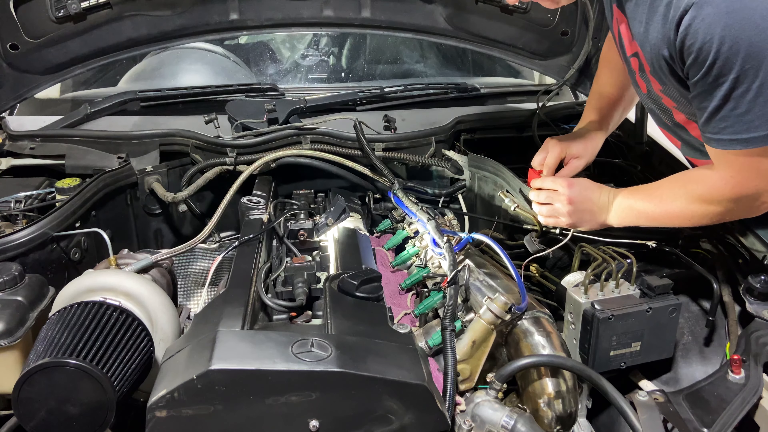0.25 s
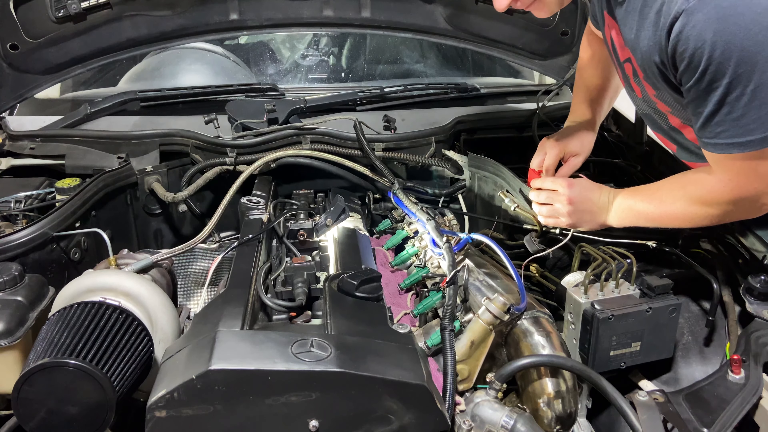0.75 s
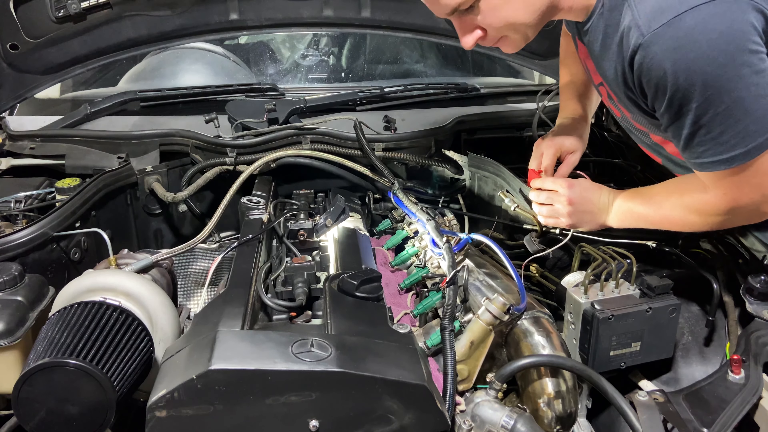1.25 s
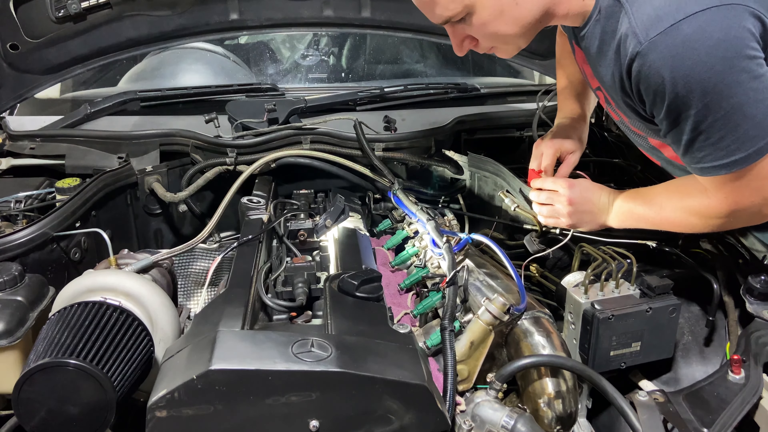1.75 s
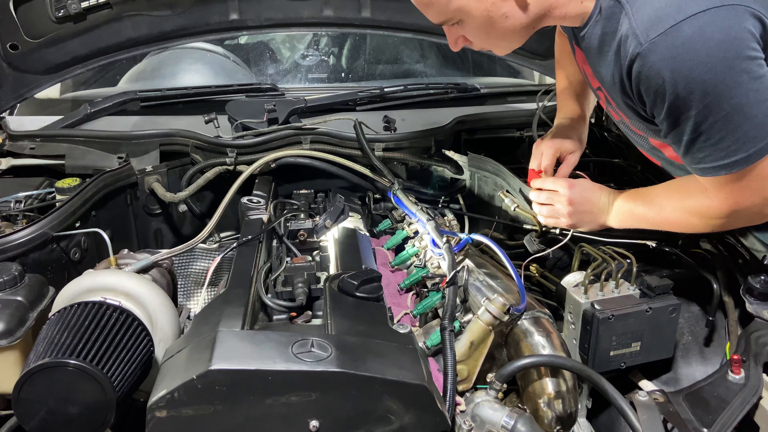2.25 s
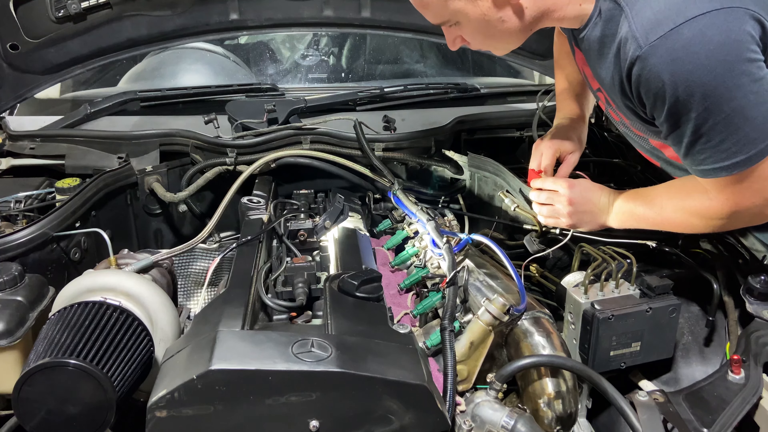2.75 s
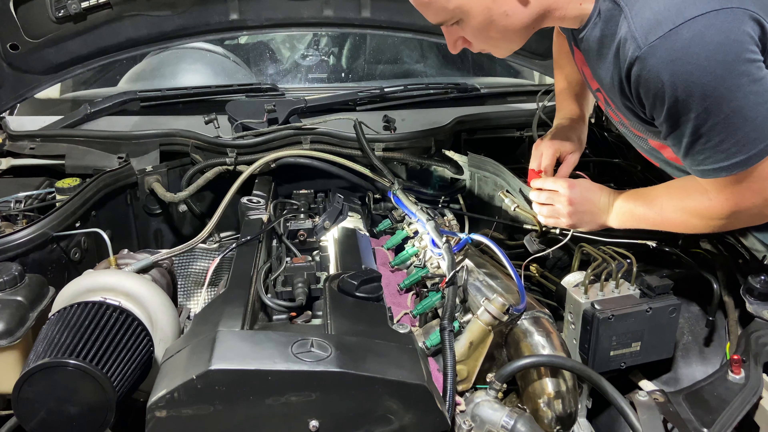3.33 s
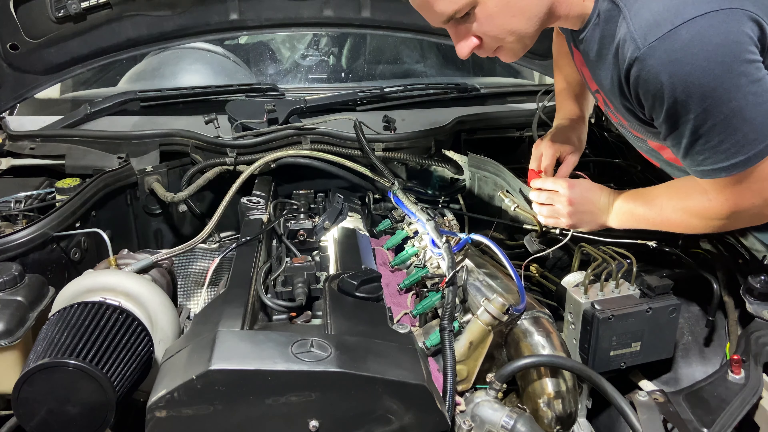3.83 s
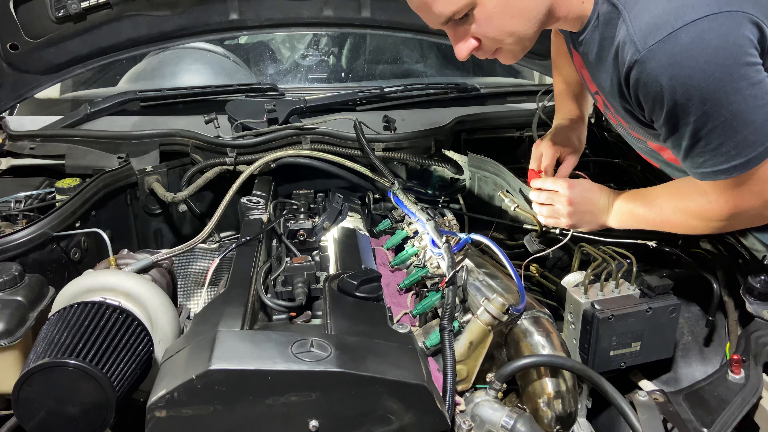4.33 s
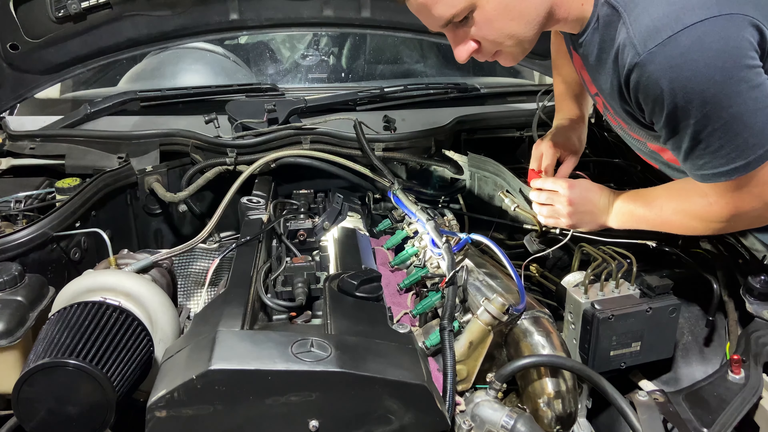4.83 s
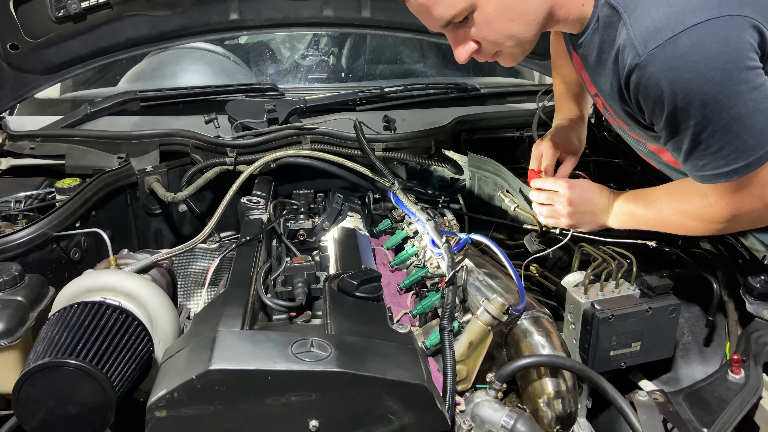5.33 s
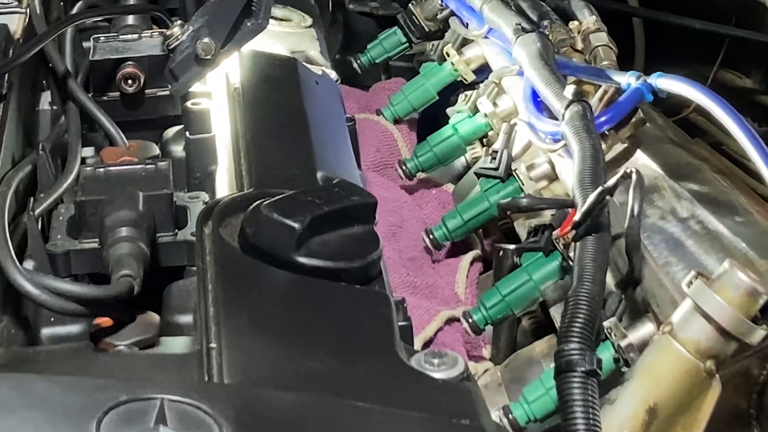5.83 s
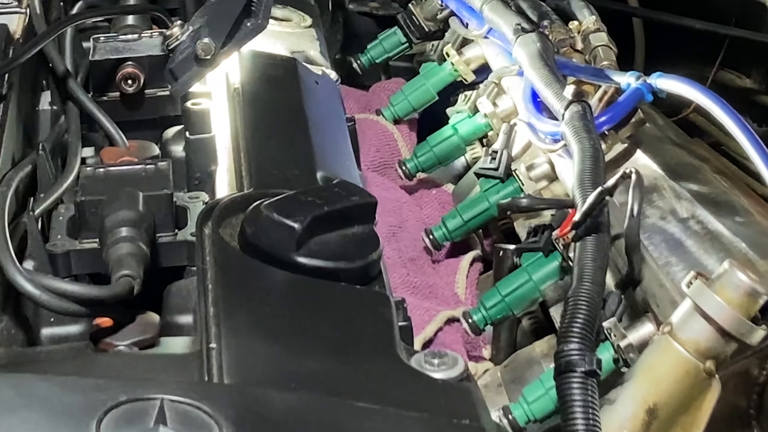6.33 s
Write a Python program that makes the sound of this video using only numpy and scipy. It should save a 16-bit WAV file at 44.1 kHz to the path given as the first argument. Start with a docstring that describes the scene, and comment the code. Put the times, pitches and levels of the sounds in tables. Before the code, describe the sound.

Close over an open engine bay: a hard metallic clack, a brief gear whine, then steady fast starter churning, rattly and breathy, without catching.

```python
"""In a garage, close over the open bonnet: a starter motor cranks a six-cylinder engine that does not fire.
First the solenoid slams the pinion in, ringing the housing, and the intake booms twice as the crank lurches.
Then the motor whirrs and its gears whine up to speed, over hiss. Each compression stroke ticks, knocks,
puffs air, loads the gear teeth, rasps and thumps the intake; metal ticks, the block hums, dull thuds pass.
Bonnet and walls echo. Two microphone ports share the bass; the left hears the high treble late and inverted."""
import sys
import numpy as np
from scipy import signal
from scipy.fft import rfft, irfft
from scipy.io import wavfile
from scipy.ndimage import uniform_filter1d

SR = 44100
rng = np.random.default_rng(int(sys.argv[2]) if len(sys.argv) > 2 else 0)


def output_pcm(signal):
    """Save a mono or channel-first signal as 16-bit PCM at the path in sys.argv[1].

    Samples are clipped to [-1, 1] before scaling.
    """
    pcm = np.clip(np.atleast_2d(signal).T, -1, 1) * 32767
    wavfile.write(sys.argv[1], SR, np.round(pcm).astype(np.int16))


N = 291060
T = np.arange(N) / SR
HZ = np.arange(N // 2 + 1) * SR / N + 1e-3  # never zero, for the logarithm
# how a sound is sent to the (shared, apart) signals of the two ports
SHARED = np.array([[1], [0]])  # heard alike at both
NEAR = np.array([[1], [.45]])  # a close part, mostly alike


def undb(db):
    """Decibels to an amplitude factor."""
    return 10 ** (np.asarray(db) / 20)


def unit(x):
    """Scale to an RMS of 1."""
    return x / np.sqrt(np.mean(x ** 2))


def over_time(table, **edges):
    """A (start_s, value) table read at every sample."""
    return np.interp(T, *np.transpose(table), **edges)


def over_hz(table):
    """A (pitch_hz, value) table read on the spectrum's bins, along log frequency."""
    hz, value = np.transpose(table)
    return np.interp(np.log(HZ), np.log(np.maximum(hz, 1)), value)


def noise(table):
    """Two unrelated noises of one colour, each bin weighted by the table."""
    spectrum = rfft(rng.standard_normal((2, N)))
    return unit(irfft(spectrum * undb(over_hz(table)), N))


def ring(x, hz, width):
    """One resonance, gain 1 at its centre."""
    return signal.lfilter(*signal.iirpeak(hz, hz / width, fs=SR), x)


def resonate(sound, table):
    """Resonances added in parallel, each lifting its own narrow band by about its level."""
    return sound + sum((undb(db) - 1) * ring(sound, hz, width) for hz, width, db in table)


def blows(times, db):
    """An impulse for each event."""
    x = np.zeros(N)
    x[np.clip((times * SR).astype(int), 0, N - 1)] = undb(db)
    return x


def swell(times, db, rise_s, hold_s, fall_s):
    """An envelope in which each event rises, holds and dies away exponentially."""
    t = T[:SR // 4]
    fall = np.exp(-np.maximum(t - rise_s - hold_s, 0) / fall_s)
    return signal.fftconvolve(blows(times, db), np.clip(t / rise_s, 0, 1) * fall)[:N]


def walk(rate):
    """Two slow random drifts of spread 1: white noise averaged twice over 1 / rate seconds."""
    size = int(SR / rate)
    return unit(uniform_filter1d(uniform_filter1d(rng.standard_normal((2, N)), size), size))


def whine(hz, wander_hz, rough_db, rate):
    """A tone whose pitch wanders and whose strength flutters."""
    strength = undb(rough_db * walk(106))
    cycles = np.cumsum(hz + wander_hz * walk(rate), axis=1) / SR
    return strength * np.sin(2 * np.pi * cycles)


# colour of the air puffs: pitch_hz, level_db (relative, per Hz)
PUFF_COLOUR = [(30, -50), (60, 6), (150, -18), (300, -1.5), (700, 0), (1200, 1.5), (1950, -4), (2500, -5.5),
               (3700, -17.5), (6000, -14), (10000, -21.5), (16000, -30)]


def air_puff(s, db):
    """Compressed air puffs out at each stroke: a short burst of broad, fluttering noise."""
    flutter = undb(0.88 * walk(170))
    return swell(s, db - 14.0, 0.002, 0.034, 0.018) * flutter * noise(PUFF_COLOUR)


def stroke_tick(s, db):
    """A small bright tick begins just ahead of each stroke, made of treble noise."""
    colour = [(2500, -30), (5000, -3), (7000, -6), (11000, 0), (16000, -3)]
    return swell(s - .004, db - 23, .006, .002, .008) * noise(colour)


# loose teeth slap on after a knock
BACKLASH_COUNT, BACKLASH_S = 2, (.012, .042)  # slaps per stroke, range of delays after its start
BACKLASH_DB, SCATTER_DB = -27.5, 5  # strength of a slap relative to the modes' drive, and its spread
# the block rings at each knock: pitch_hz, width_hz, level_db (relative)
BLOCK_MODES = [(284, 40, -4), (410, 50, -0.5), (734, 100, -3), (955, 47, 6), (1070, 40, 6.5), (1277, 43, 2),
               (1440, 68, 2), (1600, 150, -5.5), (2170, 350, -8.5)]


def block_knock(s, knock_db):
    """A burst of mid noise while the knock and the later slaps strike the block's resonances."""
    colour = [(600, -74), (900, 14.5), (1300, 10.5), (2200, -13.0)]
    knock = swell(s, knock_db - 1.5, 0.0047, 0.01, 0.016) * noise(colour)
    late = rng.random((len(s), BACKLASH_COUNT))
    slap_s = (s[:, None] + BACKLASH_S[0] + late * np.diff(BACKLASH_S)).ravel()
    for hz, width, db in BLOCK_MODES:  # every slap strikes the modes differently
        slaps = blows(slap_s, BACKLASH_DB + SCATTER_DB * rng.standard_normal(len(slap_s)))
        strikes = blows(s + 0.003, knock_db) + slaps
        knock = knock + NEAR * undb(db + 32.5) * ring(strikes, hz, width)
    return knock


# rasp of a stroke: start_s, level_db (relative)
RASP_LEVEL = [(0.34, -50), (.44, -41), (.56, -29), (.9, -31.5), (6.6, -27.5)]


def stroke_rasp(s):
    """Each stroke rasps in a narrow band of noise."""
    colour = [(3100, -33), (3450, 0.5), (3750, 1.5), (3880, 2), (4100, 0.5), (4400, -33)]
    level_db = np.interp(s, *np.transpose(RASP_LEVEL)) - 6
    return swell(s + 0.0035, level_db, 0.003, 0.021, 0.034) * noise(colour)


# rate at which teeth meet: start_s, pitch_hz
TOOTH_RATE = [(0.45, 509.9), (2.47, 509.4), (6.6, 527.3)]


def loaded_teeth(s, load_db):
    """The gear mesh sings at its tooth rate while a stroke loads it."""
    load = swell(s + 0.0068, load_db + 5.0, 0.0035, 0.022, 0.021)
    return NEAR * load * whine(over_time(TOOTH_RATE), 9.28, 1.3, 69.5)


# intake resonances: pitch_hz, width_hz, level_db (relative)
INTAKE_MODES = [(169, 27, -1), (190, 22, -2.5)]


def intake_thump(s, thump_db):
    """A firm push, its weaker rebound and turbulent air excite the intake, filtered three times over."""
    push = blows(s + 0.00697, thump_db + 59.5) + blows(s + 0.0325, thump_db + 44)
    air = swell(s + 0.0127, thump_db + 8, 0.0017, 0.009, .012) * rng.standard_normal((2, N))
    thump = 0
    for hz, width, db in INTAKE_MODES:
        broad = ring(ring(push * SHARED + air, hz, 2 * width), hz, 2 * width)
        thump = thump + undb(db) * ring(broad, hz, width)
    return thump


TICKS_PER_S = 260
TICK_FLOOR_DB, TICK_SCATTER_DB = -24, 4  # weakest impulse, mean excess over it (before the filter)


def metal_ticks(first_s):
    """Small metal parts tick at random from the first stroke on, through one broad treble resonance."""
    place, luck = rng.random((int(TICKS_PER_S * T[-1]), 2)).T
    level_db = TICK_FLOOR_DB - TICK_SCATTER_DB * np.log(1 - luck)
    ticks = blows(place * T[-1], level_db) * (T > first_s)
    return NEAR * ring(ticks, 5100, 3600)


# compression strokes, six cylinders in turn, levels relative within each part:
# start_s, puff_and_tick_db, intake_thump_db, gear_load_db, knock_db
COMPRESSIONS = [(0.341, -18.5, -53, -54, -39), (0.443, -16, -28.5, -29, -29),
                (0.566, -11.5, -25, -34, -25.5), (0.677, -9.5, -28, -22.5, -25),
                (0.784, -12, -27, -35, -28), (0.884, -13.5, -28, -28, -27), (0.986, -12.5, -30, -28, -53),
                (1.089, -14.5, -26, -30.5, -27), (1.193, -12.5, -26.5, -28.5, -28.5),
                (1.295, -16, -32, -26.5, -29), (1.4, -12.5, -30.5, -34, -29),
                (1.501, -15.5, -26, -33.5, -28), (1.607, -17, -33, -31, -28.5),
                (1.708, -14, -27.5, -28, -31), (1.812, -16, -25.5, -30.5, -23), (1.912, -13, -29, -29, -27),
                (2.015, -12.5, -28.0, -33, -27), (2.116, -12, -25.5, -29.5, -46),
                (2.221, -15, -31, -32.5, -24), (2.323, -15.5, -25, -28.5, -26),
                (2.424, -13.5, -24.5, -33, -29), (2.527, -14.5, -27, -31, -26.5),
                (2.63, -13.5, -28.5, -28.5, -25.5), (2.731, -15, -28, -30, -22.5),
                (2.83, -16, -34, -26, -23.5), (2.933, -15, -24, -27.5, -33), (3.035, -15, -26, -30.5, -30),
                (3.136, -15.5, -29, -29.5, -31), (3.239, -17.5, -27, -31.5, -27.5),
                (3.341, -15.5, -25.5, -26.5, -24.5), (3.443, -13.5, -30, -28, -29),
                (3.542, -15.5, -23, -28.5, -26), (3.643, -14, -24.5, -32, -24.5),
                (3.746, -16, -26, -31, -29), (3.845, -19, -24.5, -31, -29), (3.947, -12.5, -27, -28, -41),
                (4.05, -16.5, -34, -26.5, -27), (4.149, -12.5, -24.5, -28.5, -44),
                (4.252, -14.5, -24, -30, -23.5), (4.351, -13.5, -32, -28.5, -23),
                (4.451, -17, -24, -26.5, -24.5), (4.551, -15.5, -28, -37, -26.5),
                (4.655, -14.5, -33, -38, -27.5), (4.754, -14, -30, -33, -28), (4.855, -18, -26.0, -28, -26),
                (4.954, -16, -32, -31, -29), (5.056, -14, -28, -27, -31), (5.153, -18, -28, -26.5, -23),
                (5.256, -16, -49, -35, -26), (5.354, -17, -25.5, -30, -29.5),
                (5.45, -21, -29.5, -30, -26.5), (5.551, -15.5, -29.0, -27, -26.5),
                (5.652, -18, -27.5, -31, -24.5), (5.75, -13, -28.5, -27.5, -46),
                (5.852, -18, -31, -25, -28), (5.948, -15.5, -32, -32, -28.5),
                (6.049, -24, -27, -28.5, -23.5), (6.146, -12, -33, -30.5, -29),
                (6.245, -18, -26.5, -28, -24), (6.346, -17.5, -26, -29, -28), (6.445, -15.5, -33, -27, -37),
                (6.545, -16, -24.5, -34, -31)]
# thin covers ringing: pitch_hz, width_hz, level_db (lift)
COVERS = [(3500, 36, 6), (3632, 26, 7), (3735, 26, 7), (3935, 26, 3), (4055, 30, 7), (4720, 40, 3),
          (5060, 30, 2), (5120, 30, 2), (5360, 26, 3), (5520, 30, 3)]


def strokes(s, db, thump_db, load_db, knock_db):
    """Compression strokes: puff, rasp and ticks ring the thin covers; tick, knock, teeth and thump join."""
    clatter = resonate(air_puff(s, db) + stroke_rasp(s) + metal_ticks(s[0]), COVERS)
    struck = stroke_tick(s, db) + block_knock(s, knock_db)
    return clatter + struck + loaded_teeth(s, load_db) + intake_thump(s, thump_db)


# starter running: start_s, level_db (of the whirr)
RUNNING = [(0, -52), (.035, -45.5), (.055, -28), (.1, -24.5), (.15, -26.5), (6.6, -27.5)]
# colour of the whirr: pitch_hz, level_db (relative, per Hz)
WHIRR_COLOUR = [(24, -40), (42, -15), (78, -15), (95, -17), (125, -13.5), (175, -1), (230, -15.5),
                (330, -19), (500, -4.5), (700, -11), (1000, -10), (1600, -14), (1950, -15), (2500, -13.5),
                (5200, -18.5), (8500, -28), (16000, -39.5)]


def motor_whirr(stroke_s):
    """The motor's broad whirr, hushed a little as it bogs down before each stroke."""
    bog = swell(stroke_s - .03, 0, 0.021, 0.002, 0.0017)
    return undb(over_time(RUNNING) - 1.6 * bog + 0.87 * walk(31)) * noise(WHIRR_COLOUR)


# colour of brushes and air: pitch_hz, level_db (relative, per Hz)
HISS_COLOUR = [(4000, -42), (6500, -1.5), (10000, -3), (16000, -6)]
HISS_DB = -40.5  # at the end of the running table, before its flutter


def brush_hiss():
    """Brushes and air hiss in the treble, following the running level."""
    level_db = over_time(RUNNING) - RUNNING[-1][1] + HISS_DB
    return undb(level_db + 1.4 * walk(40)[0]) * noise(HISS_COLOUR)


# gears whining as the motor gathers speed, sagging under each stroke; the whine stops after the last row:
# start_s, low_pitch_hz, high_pitch_hz, low_level_db, high_level_db
GEAR_SPIN_UP = [(0.099, 950, 1930, -33, -40), (0.19, 1040, 2147, -25, -29.5), (.25, 1060, 2294, -29.5, -37),
                (0.3, 1043, 2980, -32, -37), (0.345, 986, 2773, -23, -29), (.38, 933, 2570, -28, -32),
                (0.415, 956, 2530, -38, -44), (0.449, 1128, 3245, -30, -33), (0.479, 1062, 3010, -23, -31),
                (.525, 958, 2890, -33, -36), (0.554, 1135, 3540, -43, -41), (0.594, 1192, 3310, -34, -34),
                (0.641, 1103, 3230, -54, -34), (0.691, 1107, 3490, -32, -37), (.74, 1013, 3320, -30, -37)]
MIDDLE_RATIO = 1.41  # pitch of the middle whine over the low one
# the middle whine joins late: start_s, level_db (against the low whine)
MIDDLE_LEVEL = [(0.16, -13), (0.3, -4)]


def gear_whine():
    """Three breathy gear tones follow the motor's first turns, pitch and strength broken up by chance."""
    s, low_hz, high_hz, low_db, high_db = np.transpose(GEAR_SPIN_UP)
    middle_db = low_db + np.interp(s, *np.transpose(MIDDLE_LEVEL))
    gears = [(low_hz, low_db), (MIDDLE_RATIO * low_hz, middle_db), (high_hz, high_db)]
    tones = 0
    for hz, db in gears:
        strength = undb(np.interp(T, s, db, left=-90, right=-90))
        # the wander is a share of the mean pitch
        tones = tones + strength * whine(np.interp(T, s, hz), .042 * np.mean(hz), 3, 500)
    return NEAR * tones


# pinion slamming into the ring gear: start_s, level_db (relative)
SLAMS = [(0.042, -26), (0.0524, -8.5), (0.071, -13.5), (0.085, -30), (0.1, -31)]
# housing struck by the slams: pitch_hz, level_db (relative), t60_s
HOUSING_MODES = [(537, -19, 0.076), (1390, -7, 0.033), (1620, -8, .03), (2070, -14, 0.042),
                 (2620, -6, 0.05), (3150, -8, 0.05), (5100, -30, .04)]


def solenoid_clunk():
    """Each slam of the pinion is a crack of noise and a blow that rings the housing."""
    s, db = np.transpose(SLAMS)
    colour = [(200, -9.0), (600, 0), (1500, 2.5), (3000, 1), (4200, -11), (8000, -9.5), (16000, -21)]
    crack = swell(s, db - 4.5, 0.0028, 0.0011, 0.012) * noise(colour)
    hits = blows(s, db)
    modes = sum(undb(g + 7) * ring(hits, hz, 2.0 / t60) for hz, g, t60 in HOUSING_MODES)
    return crack + SHARED * modes


# the intake booms twice as the crank first moves: start_s, level_db
CRANK_LURCHES = [(0.081, -18.5), (0.124, -20.5)]


def lurch_boom():
    """The first lurches of the crank boom in the intake as short, wavering low tones."""
    s, db = np.transpose(CRANK_LURCHES)
    return swell(s, db, .006, .016, .014) * whine(174.7, 6.2, 1, 60)


STEADY_FROM = 7  # first stroke of the even cranking
# hum level before its waver: start_s, level_db
HUM_LEVEL = [(0.25, -53), (0.34, -38.5), (0.9, -43.5), (2.4, -41.5), (3.2, -37), (4.9, -40), (6.6, -38)]
# parts of the hum: multiple of the stroke rate, level_db (relative)
HUM_PARTS = [(5, -0.5), (6, -22), (8, -10), (9, -27), (11, -6.5)]


def block_hum():
    """The block hums on multiples of the stroke rate, taken from every sixth stroke, and wavers."""
    s = np.array(COMPRESSIONS)[STEADY_FROM::6, 0]
    stroke_hz = np.interp(T, (s[1:] + s[:-1]) / 2, 6 / np.diff(s))
    angle = 2 * np.pi * np.cumsum(stroke_hz) / SR
    angle = angle - np.interp(np.median(s), T, angle)  # all multiples crest together at this middle time
    hum = sum(undb(db) * np.cos(round(k) * angle) for k, db in HUM_PARTS)
    return undb(over_time(HUM_LEVEL, left=-70) + 3 * walk(3.1)[0]) * np.sqrt(2) * hum


# dull low thuds: start_s, level_db
DULL_THUDS = [(.12, -38), (.34, -38), (0.729, -49), (1.76, -42), (2.39, -36), (3.02, -37), (3.43, -41),
              (3.651, -46), (4.05, -35), (4.85, -38), (5.71, -40), (6.34, -39)]


def low_thuds():
    """Now and then a dull thud passes through the block: a swelling deep tone of slightly unsteady pitch."""
    s, db = np.transpose(DULL_THUDS)
    return swell(s, db, 0.038, .02, .025) * whine(43.4, 1.44, 0, 5.5)[0]


GARAGE_DB, GARAGE_T60_S = -14, .1


def garage_echoes(sound):
    """Dense echoes of bonnet and walls: convolution with decaying noise, strongest in the middle range."""
    t = T[:SR // 4]
    echoes = rng.standard_normal(len(t)) * undb(-60 * t / GARAGE_T60_S) * (t > .002)
    echoes = ring(echoes, 2920, 5500)
    echoes = undb(GARAGE_DB) * echoes[None] / np.linalg.norm(echoes)
    return signal.fftconvolve(sound, echoes, axes=1)[:, :N]


# housing and engine bay resonances: pitch_hz, width_hz, level_db (lift over the broad sound)
ENGINE_BAY = [(98, 7.7, 6.5), (286.1, 11.8, 9), (364, 11, 6), (422, 18.4, 5.5), (934, 9.8, 8),
              (1000, 26, 4.5), (1074, 6.5, 9), (1058, 15, 0), (1220, 11, 4), (1291, 40, 6), (1320, 21, -1),
              (1424, 36, 4), (1530, 20, 2), (1627, 24, 1.5), (1610, 14, 11), (5190, 470, 5.5),
              (7020, 380, 3)]


def scene():
    """All sources sum, ring the housing and engine bay, then echo in the garage."""
    rows = np.transpose(COMPRESSIONS)
    sound = strokes(*rows) + motor_whirr(rows[0]) + brush_hiss() + gear_whine()
    sound = sound + solenoid_clunk() + lurch_boom() + block_hum() + low_thuds()
    sound = resonate(sound, ENGINE_BAY)
    return sound + garage_echoes(sound)


# how alike the two ports hear: pitch_hz, likeness (0-1)
PORT_LIKENESS = [(50, 0.99), (130, 1), (300, 0.58), (600, 0.49), (1300, 0), (3000, 0.29), (5000, 0.35),
                 (7000, 0.98)]
# balance of the ports: pitch_hz, left_minus_right_db
PORT_PAN = [(60, -8.5), (110, 5), (200, 1), (700, 1), (1300, 1), (2400, 2), (4400, 3.5), (6500, 1.5)]
# phase of the left port below PORT_HZ: pitch_hz, lead_rad
PORT_LEAD = [(500, -0.0097), (1300, 0.4), (2700, 0.13), (5000, -0.46), (5500, -1.23), (6600, -1.08)]
PORT_LAG_S, PORT_HZ = 0.0002213, 6810  # lag of the left port, and the pitch above which it applies
SAME_HZ, TOP_HZ = 8600, 15800  # above SAME_HZ both ports carry nearly one sound; TOP_HZ is the cut


def record(dry):
    """Ports share the bass; in the high treble the left hears it late and inverted. Then the top is cut."""
    shared, apart = rfft(dry)
    like = np.clip(over_hz(PORT_LIKENESS + [(SAME_HZ, .93)]), 0, 1)
    shared, apart = shared * np.sqrt((1 + like) / 2), apart * np.sqrt((1 - like) / 2)
    late_inverted = 3 * np.pi - 2 * np.pi * HZ * PORT_LAG_S
    lead = np.where(HZ > PORT_HZ, late_inverted, over_hz(PORT_LEAD))
    pan = undb(over_hz(PORT_PAN + [(SAME_HZ, 0)]) / 2)
    left = (shared + apart) * pan * np.exp(1j * lead)
    right = (shared - apart) / pan
    top_cut = signal.ellip(12, .2, 90, TOP_HZ, fs=SR, output="sos")
    return signal.sosfilt(top_cut, irfft(np.array([left, right]), N))


dry = scene()
out = record(dry)
output_pcm(out)
```